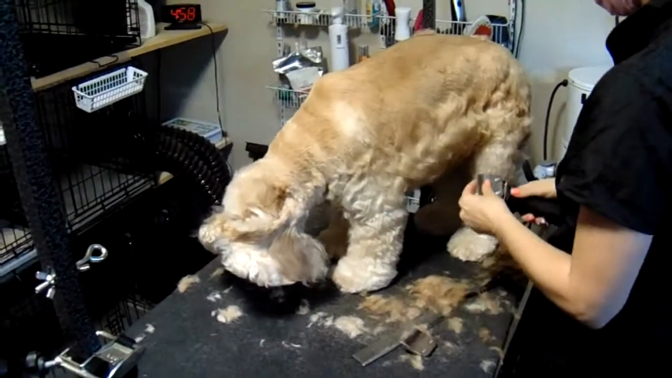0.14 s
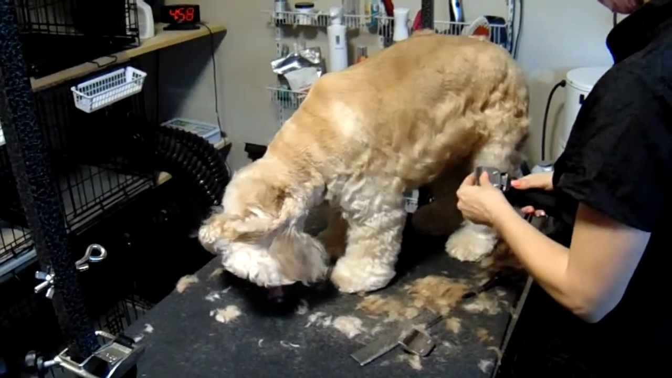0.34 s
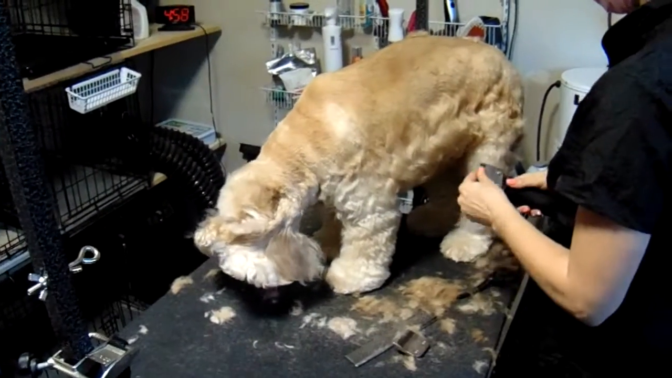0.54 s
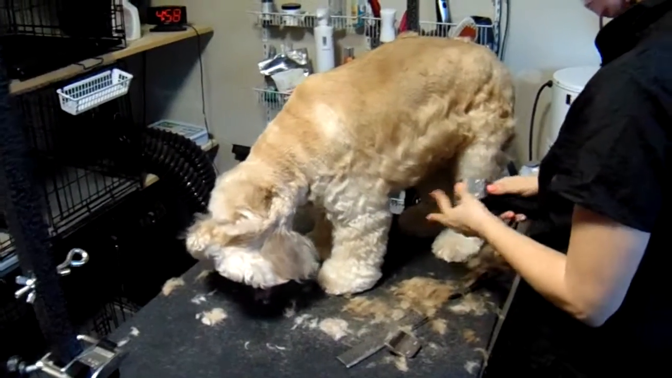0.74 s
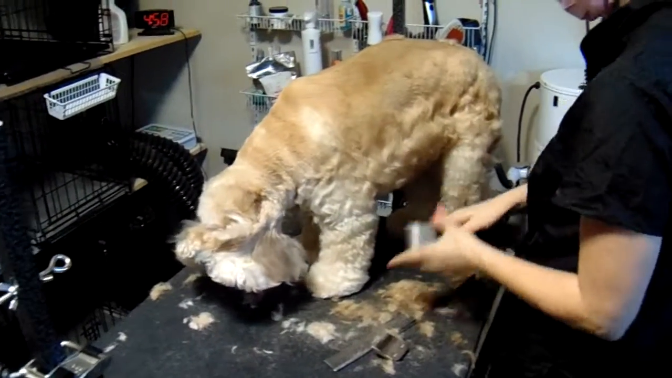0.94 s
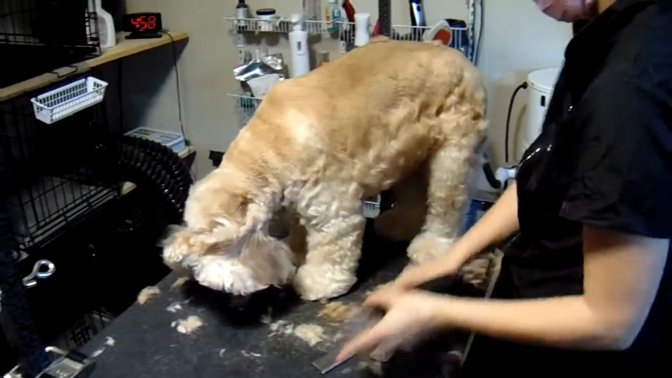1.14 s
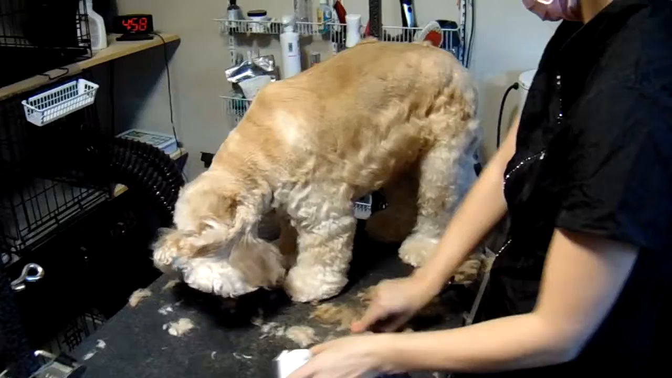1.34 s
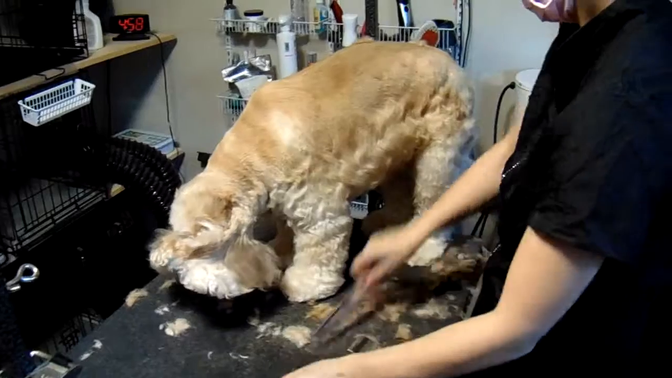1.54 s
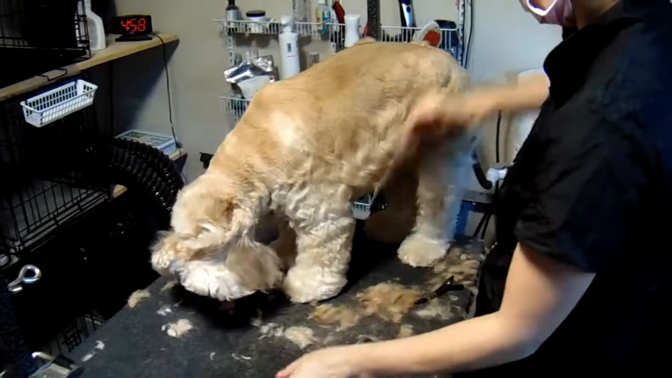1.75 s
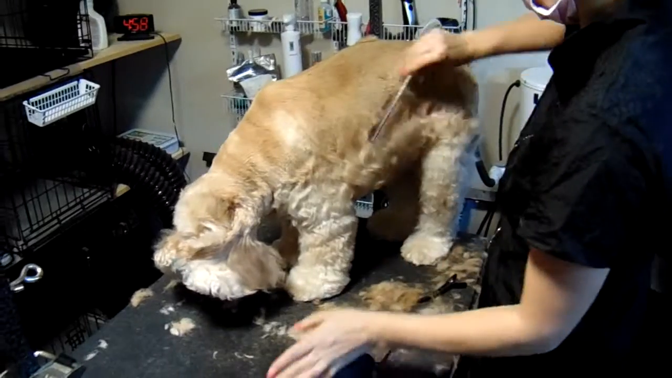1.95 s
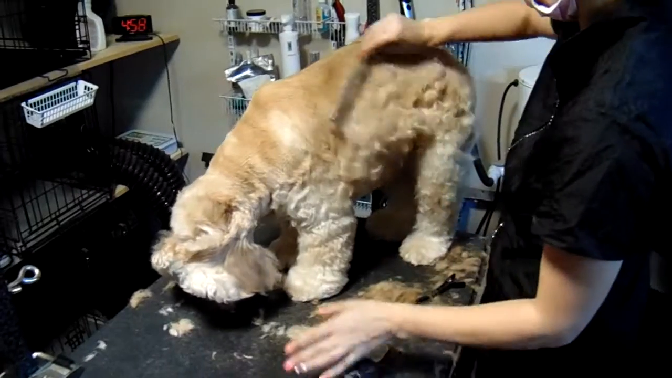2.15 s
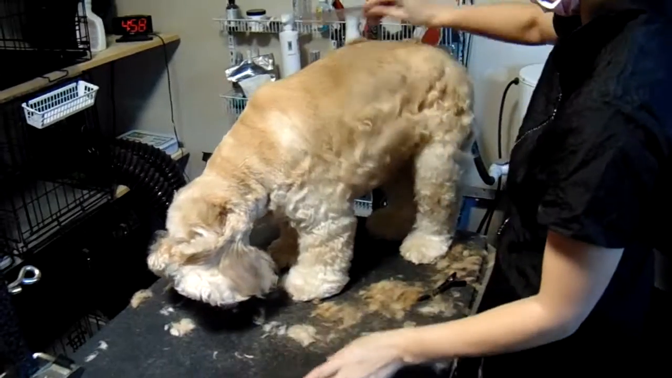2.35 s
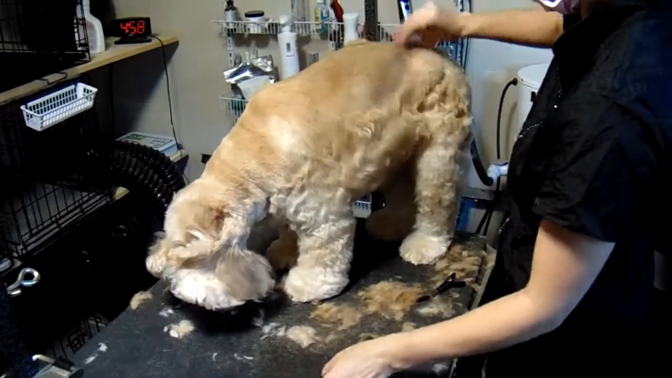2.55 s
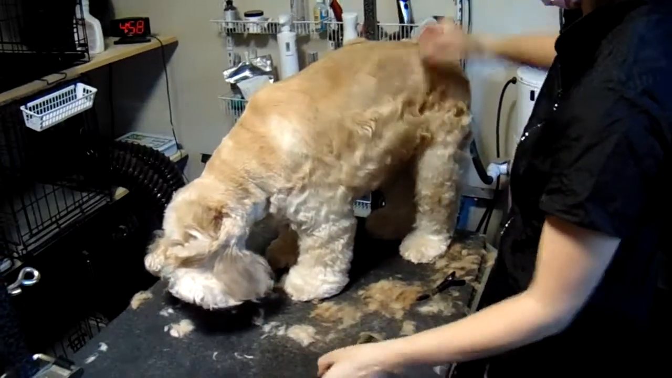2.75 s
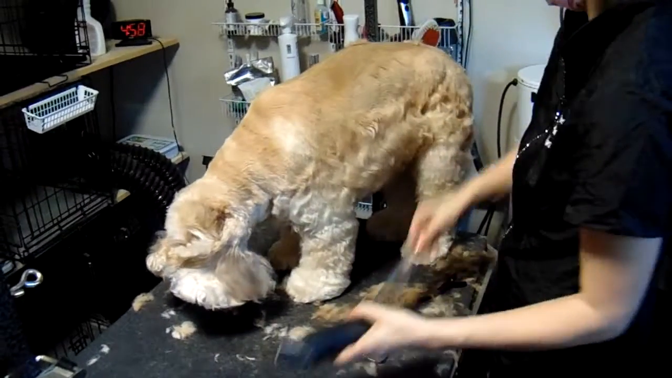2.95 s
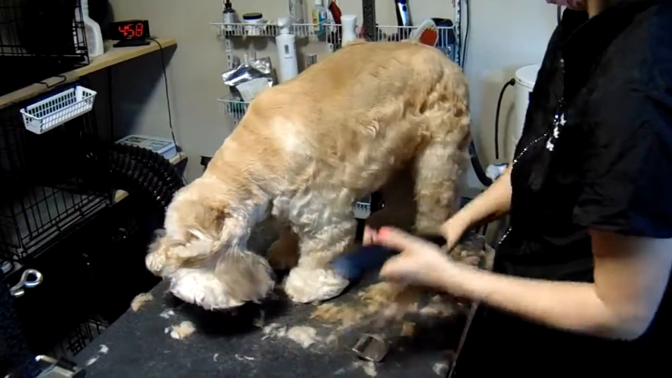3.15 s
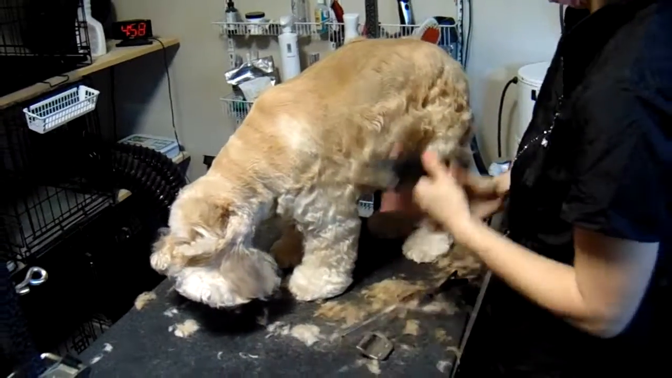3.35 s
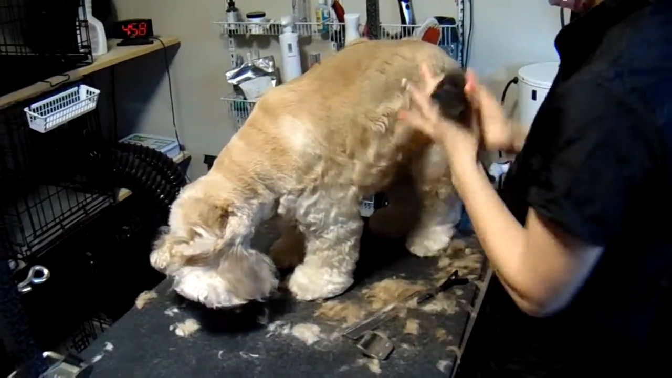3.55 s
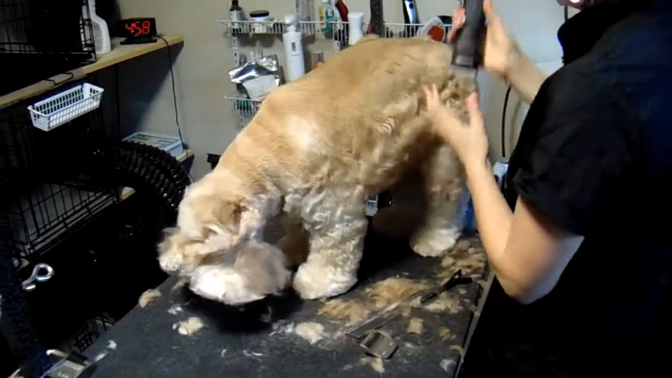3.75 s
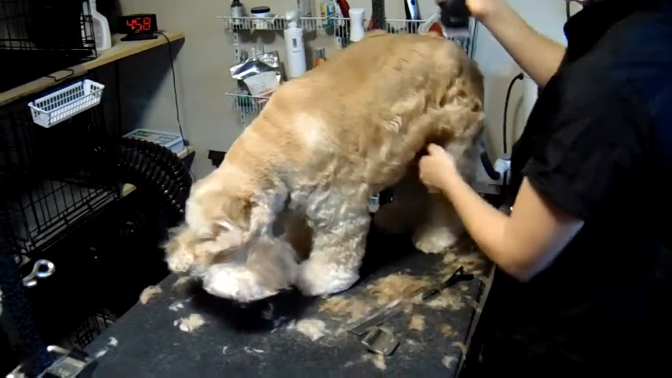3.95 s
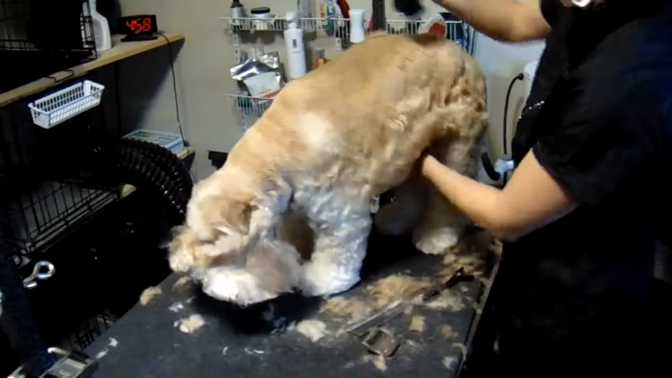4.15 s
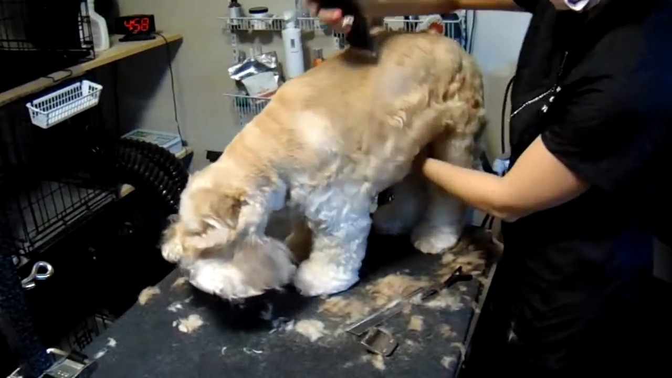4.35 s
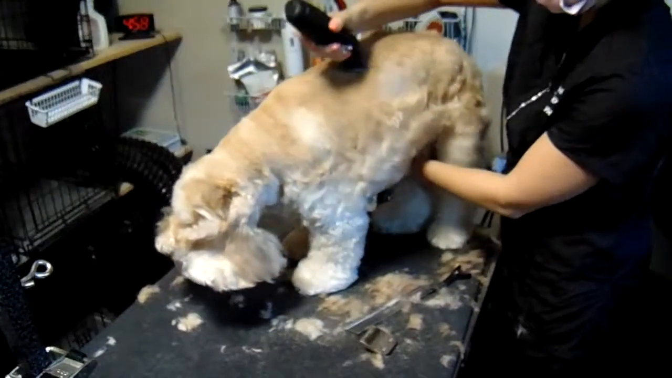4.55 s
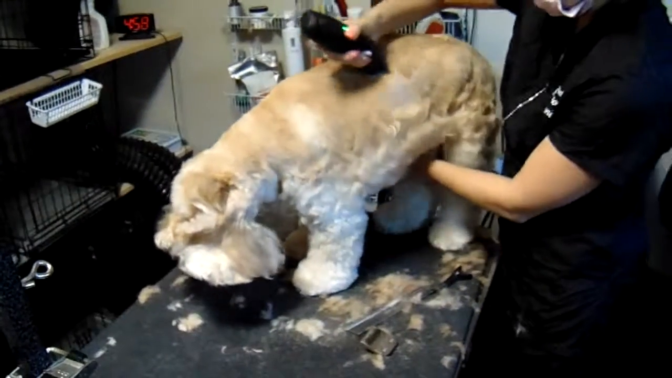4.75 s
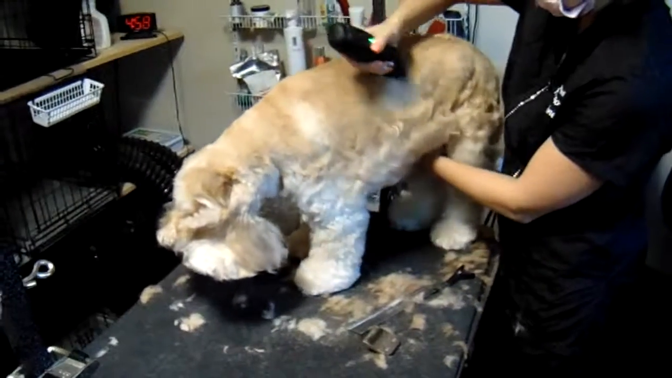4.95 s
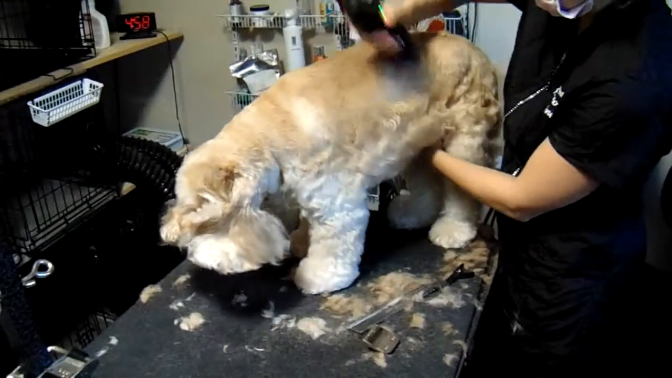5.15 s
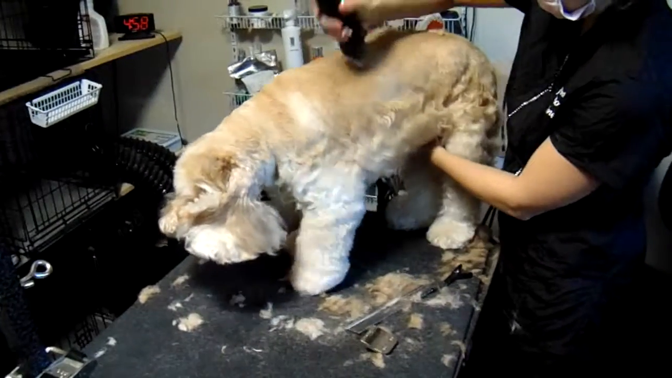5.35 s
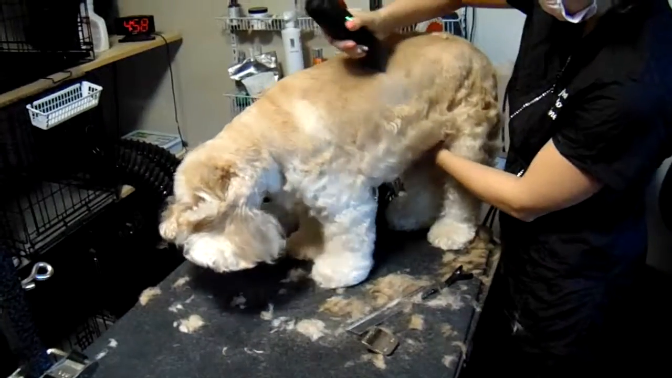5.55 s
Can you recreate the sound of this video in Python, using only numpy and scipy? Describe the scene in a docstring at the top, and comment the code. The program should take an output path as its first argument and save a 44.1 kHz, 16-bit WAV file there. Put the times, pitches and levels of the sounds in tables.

```python
"""Small, hard-walled room where a dog is groomed on a table. A metal guard is fiddled onto the clippers and
snaps home; a steel comb strokes the coat and drops on the table; then the clippers spin up and run.
Struck bodies are contact bursts through body spectra plus dying sines; the clippers follow motor speed
and cutting load. Close to the microphone a small lens motor ticks in short runs over a steady hiss."""
import sys
import numpy as np
from scipy import signal
from scipy.fft import rfft, irfft
from scipy.io import wavfile
from scipy.ndimage import map_coordinates

SR = 44100
rng = np.random.default_rng(int(sys.argv[2]) if len(sys.argv) > 2 else 0)


def persist_wave(psi):
    """Save psi, clipped to +-1, as 16-bit WAV."""
    counts = np.round(np.clip(psi, -1, 1) * 32767).astype(np.int16)
    wavfile.write(sys.argv[1], SR, np.atleast_2d(counts).T)


N = 246959


def from_db(db):
    """Decibels to amplitude."""
    return 10 ** (np.asarray(db) / 20)


def rms_one(x):
    """Scale to rms 1."""
    return x / np.sqrt(np.mean(x ** 2) + 1e-20)


def energy_one(x):
    """Scale to energy 1."""
    return x / np.sqrt(np.sum(x ** 2) + 1e-20)


def seconds(size):
    """Time axis."""
    return np.arange(size) / SR


def at_hz(points, hz):
    """Read a table on a log-frequency axis."""
    f, value = np.transpose(points)
    return np.interp(np.log(hz + 1e-6), np.log(f), value)


def along_time(points):
    """Read a table of (s, value) at every sample."""
    return np.interp(seconds(N), *np.transpose(points))


def through(x, response):
    """Pass a signal through an impulse response."""
    return signal.fftconvolve(x, response)[:N]


def colour(spectrum, size=4096):
    """Causal (minimum-phase) response of the given spectrum, by folding its cepstrum."""
    log_gain = np.log(from_db(at_hz(spectrum, np.fft.rfftfreq(size, 1 / SR))))
    cepstrum = irfft(log_gain)
    cepstrum[1:size // 2] *= 2
    cepstrum[size // 2 + 1:] = 0
    return energy_one(irfft(np.exp(rfft(cepstrum))))


def noise(spectrum):
    """Coloured noise of rms about 1."""
    return through(rng.standard_normal(N), colour(spectrum))


def drift(rate):
    """Smooth random curve through `rate` new values a second, each of spread 1."""
    return map_coordinates(rng.standard_normal(1024), [seconds(N) * rate], order=3, mode="grid-wrap")


def ringing(modes):
    """Response of a struck body: a sum of dying sines of alternating sign."""
    t = seconds(SR // 2)
    total = 0
    for k, (hz, db, t60) in enumerate(modes):
        decay = from_db(db - 60 * t / t60)
        total = total + (-1) ** k * decay * np.sin(2 * np.pi * hz * t)
    return energy_one(total)


def struck(times, levels_db, modes):
    """Clean blows on a ringing body."""
    clicks = np.zeros(N)
    at = np.clip(np.round(times * SR).astype(int), 0, N - 1)
    clicks[at] = from_db(levels_db)
    return through(clicks, ringing(modes))


def contacts(times, levels_db, grind, grind_s):
    """Each contact is a sharp click, then a brief grinding of the surfaces that swells and dies."""
    out, t = np.zeros(N + SR), seconds(SR // 10)
    for s, db in zip(times, levels_db):
        touch = grind * energy_one(rng.standard_normal(len(t)) * np.sqrt(t) * np.exp(-t / grind_s))
        touch[0] += 1
        # a hard contact excites all frequencies equally: the colour comes from the body
        phase = np.angle(rfft(touch, 2 * len(t)))
        touch = irfft(np.exp(1j * phase))[:len(t)]
        at = max(round(s * SR), 0)
        out[at:at + len(t)] += from_db(db) * energy_one(touch)
    return out[:N]


def room(gap_s, tail_db):
    """Direct sound, then, after a short gap, a diffuse tail that dies by band."""
    # Reverberation. Each row: frequency in Hz, T60 in s.
    room_t60 = [(150, 0.65), (1000, 0.3), (5000, 0.27), (13000, 0.24)]
    t = seconds(SR // 2)
    edges_hz, tail = np.geomspace(60, 18000, 10), 0
    for low, high in zip(edges_hz, edges_hz[1:]):
        band_filter = signal.butter(2, [low, high], "band", fs=SR, output="sos")
        band = signal.sosfilt(band_filter, rng.standard_normal(len(t)))
        t60 = at_hz(room_t60, np.sqrt(low * high))
        tail = tail + band * from_db(-60 * t / t60)
    response = from_db(tail_db) * energy_one(tail * (t > gap_s))
    response[0] += 1
    return energy_one(response)


def background():
    """Steady hiss, coloured from noise, with faint appliance tones as sines."""
    # Hiss spectrum. Each row: frequency in Hz, relative level in dB.
    hiss_spectrum = [(12, -9), (20, 6.5), (102, -9), (154, -11), (192, -3), (252, -9), (274, -5.5),
                     (382, -8), (489, -9), (531, -9.5), (922, -6), (1180, -6.5), (3370, -16), (6000, -11.5),
                     (14500, -21.5)]
    # Appliance tones. Each row: frequency in Hz, rms level in dB.
    whines = [(97, -69.5), (5841, -69.5)]
    hiss_db = -52
    t = seconds(N)
    tones = sum(from_db(db) * np.sqrt(2) * np.sin(2 * np.pi * hz * t) for hz, db in whines)
    return from_db(hiss_db) * noise(hiss_spectrum) + tones


def lens_motor():
    """Nearly evenly spaced motor steps, each a soft tick that rings the lens body."""
    # Motor runs. Each row: start in s, end in s, mean tick level in dB.
    runs = [(0.016, 0.06, -16.5), (0.149, 0.56, -16.5), (0.651, 0.86, -18.5), (3.986, 4.13, -18.5),
            (4.253, 4.76, -18.5), (4.851, 5.13, -20)]
    # Lens body modes. Each row: frequency in Hz, relative level in dB, T60 in s.
    body_modes = [(277.4, 4, 0.047), (326, 2.5, 0.055), (615, -4.5, 0.023), (975, -1, 0.039)]
    steps_per_s = 30
    steps = [(s, db) for start, end, db in runs for s in np.arange(start, end, 1 / steps_per_s)]
    s, db = np.transpose(steps)
    jittered_s = s + rng.normal(0, 0.0014, len(s))
    jittered_db = db + rng.normal(0, 0.11, len(s))
    return struck(jittered_s, jittered_db, body_modes)


def table_rumble():
    """Arms and tools bump the table: low noise that rises fast and settles."""
    # Bumps. Each row: start in s, relative level in dB.
    bumps = [(1.485, -49), (1.56, -51), (1.66, -47), (1.93, -55)]
    # Rumble spectrum. Each row: frequency in Hz, relative level in dB.
    rumble_spectrum = [(15, -50), (25, -4), (65, 1.5), (130, -8), (270, -10.5), (340, -30), (400, -13),
                       (520, -20), (880, -120)]
    attack_s, t60_s, gain_db = 0.014, 0.51, 4
    t, power = seconds(N), 0
    for s, db in bumps:
        attack = np.clip((t - s) / attack_s, 0, 1)
        decay = from_db(db - 60 * np.maximum(t - s - attack_s, 0) / t60_s)
        power = power + attack ** 2 * decay ** 2
    return from_db(gain_db) * np.sqrt(power) * noise(rumble_spectrum)


def coat():
    """Hands and comb stroke the coat; at 3.52 s, the wash of the dropped comb's clatter dying away."""
    # Swells of soft noise. Each row: start in s, length in s, level at the top of the arch in dB.
    swells = [(0, 1.17, -48), (1.34, 0.14, -53.5), (2.62, 0.59, -53.5), (3.52, 0.35, -54.5),
              (3.92, 0.15, -54)]
    # Soft noise spectrum. Each row: frequency in Hz, relative level in dB.
    soft_spectrum = [(350, -34), (600, -6), (845, -9), (1530, -4), (1720, -7.5), (2920, -4.5), (5070, -1),
                     (7340, 2), (14000, -28)]
    arch_exponent = 0.55   # smaller is flatter
    t, envelope = seconds(N), 0
    for s, length, db in swells:
        arch = np.abs(np.sin(np.pi * np.clip((t - s) / length, 0, 1)))
        envelope = envelope + from_db(db) * arch ** arch_exponent
    return envelope * noise(soft_spectrum)


def knocks():
    """Light knocks of tools, hands and the switch, each with its share of hollow body and bright tick."""
    # Knocks. Each row: start in s, hollow knock level in dB, bright tick level in dB.
    hits = [(1.463, -26, -22.5), (1.5, -12, -17.5), (1.617, -17, -21.5), (1.677, -19.5, -15),
            (1.705, -16.5, -18.5), (1.899, -12, -22), (1.95, -24, -16), (2.219, -21, -21.5),
            (2.45, -18, -30), (2.515, -22, -27), (2.627, -21, -37), (2.738, -19.5, -20), (4.03, -37, -17.5),
            (4.191, -18, -15.5)]
    # Hollow body spectrum. Each row: frequency in Hz, relative level in dB.
    hollow_spectrum = [(150, -27), (250, -18), (664, -2), (735, 1), (1420, 1.5), (1710, -1), (2400, -3),
                       (3700, -10.5), (7140, -15), (14000, -35)]
    # Bright tick spectrum. Each row: frequency in Hz, relative level in dB.
    tick_spectrum = [(1000, -43), (3000, -6.5), (4300, -1), (7300, 5), (9000, -13), (14000, -11)]
    s, knock_db, tick_db = np.transpose(hits)
    hollow = through(contacts(s, knock_db, grind=1.76, grind_s=0.0036), colour(hollow_spectrum))
    bright = through(contacts(s, tick_db, grind=2.2, grind_s=0.0032), colour(tick_spectrum))
    return through(hollow + bright, room(gap_s=0.0031, tail_db=0.5))


def housing():
    """The guard is pushed along the plastic housing with dull, hollow clacks."""
    # Clacks. Each row: start in s, level in dB.
    hits = [(0.626, -3), (0.663, 6.5), (0.678, -4), (0.694, -6)]
    # Plastic spectrum. Each row: frequency in Hz, relative level in dB.
    plastic_spectrum = [(180, -35), (300, -16), (465, -16), (565, -4), (623, -7), (904, 5.5), (1170, -3.5),
                        (1790, -1), (2100, -11.5), (3100, 0), (4020, -6.5), (6340, -4), (12700, -21.5),
                        (14500, -28)]
    # Housing modes. Each row: frequency in Hz, relative level in dB, T60 in s.
    plastic_modes = [(729, -1, 0.062), (820, -3, 0.12), (907, 5, 0.096), (1030, 8, .1), (1250, 4, 0.14),
                     (1440, 8, 0.16), (3170, -17, 0.17)]
    s, db = np.transpose(hits)
    clacks = through(contacts(s, db, grind=3.8, grind_s=0.0048), colour(plastic_spectrum))
    ring = from_db(-6.0) * struck(s, db, plastic_modes)
    return through(clacks + ring, room(gap_s=0.0033, tail_db=2.5))


def guard():
    """The guard's metal teeth tap the blade and ring; the hands shield the direct sound of the taps."""
    # Taps on the blade. Each row: start in s, tap level in dB, ring level of the teeth in dB.
    hits = [(0.001, -7, -5), (0.221, 6, -15), (0.2245, 1.5, -0.5), (0.395, -10.5, -19), (0.415, -34, -26),
            (0.465, 6, -0.5), (0.469, 0, -22)]
    # Tap spectrum. Each row: frequency in Hz, relative level in dB.
    tap_spectrum = [(180, -42), (300, 0), (389, -26.5), (584, -1.5), (675, -9.5), (744, -3), (1030, -6.5),
                    (1130, -16), (1470, -7), (3770, -21), (5570, 0.5), (7100, 1), (9510, -13),
                    (13400, -18.5), (14500, -43)]
    # Tooth modes. Each row: frequency in Hz, relative level in dB, T60 in s.
    tooth_modes = [(5220, -5, .14), (5370, -1, .2), (5425, 0, .24), (5510, -7, .14), (6428, -10, .12),
                   (6993, -12, .13), (8430, -7, .14)]
    s, tap_db, ring_db = np.transpose(hits)
    taps = through(contacts(s, tap_db, grind=3.8, grind_s=0.0037), colour(tap_spectrum))
    # tail above direct sound for the taps; the ring stays dry
    return through(taps, room(gap_s=0.0027, tail_db=3)) + struck(s, ring_db, tooth_modes)


def latch():
    """The spring latch slips, snaps home and rebounds, setting the clipper head ringing."""
    # Latch contacts. Each row: start in s, level in dB.
    hits = [(0.8676, 5), (0.8704, 10.5), (0.8742, 15), (0.8842, 3)]
    # Snap spectrum. Each row: frequency in Hz, relative level in dB.
    snap_spectrum = [(120, -61), (200, -31), (499, -17), (727, -7.5), (854, -20), (968, -6), (1310, -9.5),
                     (1720, 0), (2460, -13.5), (2890, -7), (3710, -11), (5710, -2.5), (9100, -14),
                     (10100, -13), (14500, -28)]
    # Clipper head modes. Each row: frequency in Hz, relative level in dB, T60 in s.
    head_modes = [(757, -2, 0.11), (1138, -2, .16), (1440, -5, .13), (1540, 1, 0.13), (1705, -3, 0.2),
                  (1925, 5.5, 0.14), (2000, -12, 0.27), (3500, -13, .16), (4210, 5.5, 0.056),
                  (4330, 3, 0.07), (4700, -9, 0.07)]
    s, db = np.transpose(hits)
    snap = through(contacts(s, db, grind=2.0, grind_s=0.0017), colour(snap_spectrum))
    ring = from_db(-6.5) * struck(s, db, head_modes)
    return through(snap + ring, room(gap_s=0.0031, tail_db=-6.0))


def comb():
    """The steel comb lands, bounces and rings, its teeth rattle; the table top thuds under it."""
    # Landings. Each row: start in s, steel level in dB, table thud level in dB, tooth rattle level in dB.
    hits = [(3.3154, 12, 0, -20), (3.325, -8, -8, -6), (3.395, -2, -22, -18), (3.429, -6, -8, -20),
            (3.437, -4.5, -18, -11), (3.48, -23.5, -15, -18), (3.527, -13.5, -30, -9),
            (3.607, -24, -28, -16.5)]
    # Steel spectrum. Each row: frequency in Hz, relative level in dB.
    steel_spectrum = [(410, -38), (700, -16), (775, -40), (1050, -20), (1580, -22.5), (2060, -15),
                      (2430, -23), (2930, -9.5), (3550, -23), (4080, -9), (5190, -17), (6360, 4.5),
                      (9420, -8), (13300, -11.5), (14500, -26)]
    # Tooth rattle spectrum. Each row: frequency in Hz, relative level in dB.
    rattle_spectrum = [(1000, -12), (3300, -19), (4200, -3.5), (5300, -6.5), (7200, -1), (8200, -9),
                       (9700, -1), (12000, -28), (13700, -9), (14500, -31)]
    # Steel modes. Each row: frequency in Hz, relative level in dB, T60 in s.
    steel_modes = [(4100, -21, .12), (6089, -4, .12), (6218, -3, .15), (7050, 1, .11), (7181, -1, .13),
                   (7623, -7, .13), (8333, -8, .13), (10410, -16, .12)]
    # Bending modes of the spine. Each row: frequency in Hz, relative level in dB, T60 in s.
    spine_modes = [(2910, -5, 0.16), (2940, -0.5, 0.085), (3030, 3, 0.055)]
    # Table top modes. Each row: frequency in Hz, relative level in dB, T60 in s.
    table_modes = [(164.2, 4.5, 0.23), (220, -1.5, 0.12), (255, 5, 0.11), (311, 5.5, 0.031),
                   (386, 2.5, 0.033), (443, 0, 0.046)]
    ring_db, spine_db = -7, -21.5
    spine_db_per_db = 1.6   # hard landings bend the spine far more than light bounces
    s, steel_db, thud_db, teeth_db = np.transpose(hits)
    clatter = through(contacts(s, steel_db, grind=7.7, grind_s=0.0065), colour(steel_spectrum))
    rattle = through(contacts(s, teeth_db, grind=5.0, grind_s=0.013), colour(rattle_spectrum))
    ring = from_db(ring_db) * struck(s, steel_db, steel_modes)
    bending = struck(s, spine_db + spine_db_per_db * steel_db, spine_modes)
    thud = struck(s, thud_db, table_modes)
    return through(clatter + rattle + ring + bending + thud, room(gap_s=0.0037, tail_db=-4.5))


def cutting_load():
    """The load builds as the blade enters the coat and eases as the hair falls away."""
    # Bites into the coat. Each row: deepest point in s, load from 0 to 1.
    bites = [(4.58, 0.38), (5.0, 0.75)]
    rise_s, release_s = .12, .22
    t, load = seconds(N), 0
    for s, depth in bites:
        fall = np.where(t < s, ((s - t) / rise_s) ** 2, (t - s) / release_s)
        load = load + depth * np.exp(-fall)
    return load


def hum(turns, hum_gain, case_gain):
    """The drive shakes the case at multiples of the turn rate; one multiple meets a resonance and sings."""
    # Multiples that stand out. Each row: multiple of the turn rate, relative level in dB.
    strong_orders = [(9, -7), (19, -6), (22, 0), (28, -4), (29, -4), (35, -4), (39, -2), (44, -2), (46, -1),
                     (48, 0), (56, -7), (68, -7), (76, -8)]
    # All other multiples. Each row: frequency in Hz, mean relative level in dB.
    weak_orders = [(500, -18), (1100, -10), (1400, -11), (2150, -8), (2600, -14), (3400, -14)]
    full_turns_per_s = 43.8
    case_order, case_hz, case_half_width_hz = 21, 918, 90

    def order(k):
        """Sine of rms 1 at k times the turn rate, with random phase."""
        return np.sqrt(2) * np.sin(2 * np.pi * (k * turns + rng.random()))

    def wander():
        """A line swells and fades as the clippers move through the room's standing waves."""
        knots_s = np.arange(0, N / SR + 1, .22)
        return np.interp(seconds(N), knots_s, from_db(rng.normal(0, 2.5, len(knots_s))))

    levels_db = {k: at_hz(weak_orders, k * full_turns_per_s) + rng.normal(0, 2) for k in range(13, 77)}
    levels_db.update(strong_orders)
    lines = (from_db(db) * wander() * order(k) for k, db in levels_db.items() if k != case_order)
    stack = rms_one(sum(lines))
    # the singing multiple only takes off once the motor is near full speed
    turns_per_s = np.gradient(turns) * SR
    detuning = (case_order * turns_per_s - case_hz) / case_half_width_hz
    singing = order(case_order) / np.hypot(1, detuning)
    return hum_gain * stack + case_gain * singing


def blade(turns, sharpness, buzz_db, hiss_db, size=1024):
    """The cutter rubs over the same teeth on every turn and hisses, hardest at its two reversals."""
    # Blade spectrum. Each row: frequency in Hz, relative level in dB.
    blade_spectrum = [(1350, -48), (2300, 3.5), (2600, -5.5), (3080, -4.5), (4160, -5.5), (5450, -1),
                      (7250, -2), (8260, -5), (9350, -13.5), (11600, -15), (13800, -26), (14500, -30)]
    stroke = rms_one(np.exp(sharpness * np.cos(2 * np.pi * 2 * turns)))
    # flat-spectrum random profile, read once per turn
    profile = rms_one(irfft(np.exp(2j * np.pi * rng.random(size // 2 + 1))))
    teeth = map_coordinates(profile, [turns % 1 * size], order=3, mode="grid-wrap")
    rub = stroke * (from_db(buzz_db) * teeth + from_db(hiss_db) * rng.standard_normal(N))
    highpass = signal.butter(4, 2500, "high", fs=SR, output="sos")
    bright = signal.sosfilt(highpass, through(rub, colour(blade_spectrum)))
    return through(bright, room(gap_s=0.0023, tail_db=-6.5))


def clippers():
    """Speed and load drive the motor hum, the case whirr, the blade chatter and the rasp of cut hair."""
    # Running speed, sagging a little in the coat. Each row: time in s, turns per s before spin-up and wobble.
    running_speed = [(4.62, 43.8), (4.696, 43.9), (5.088, 43.5), (5.366, 44.0), (5.6, 44.2)]
    # Singing multiple of the case. Each row: time in s, level in dB before trim, speed and detuning.
    singing_levels = [(4.55, -47), (4.59, -42), (5.034, -43.5), (5.084, -49), (5.252, -42.5),
                      (5.408, -56.5), (5.6, -51)]
    # Whirr of bearings and air in the case. Each row: frequency in Hz, relative level in dB.
    whirr_spectrum = [(60, -12), (100, -4.5), (250, -13), (480, -4.5), (780, 0.5), (1100, -6.5),
                      (2200, 0.5), (3200, -11), (6000, -24)]
    # Rasp of sheared hair. Each row: frequency in Hz, relative level in dB.
    hair_spectrum = [(400, -30), (750, -3), (1000, -3), (1500, 0), (2200, -3), (3000, -14), (6000, -26)]
    switch_on_s, spin_up_s = 4.185, .418
    hum_speed_power, blade_speed_power = 6, 1.5   # amplitude grows as these powers of the speed
    hum_db, hum_load_db, singing_trim_db = -47.3, 6, 0.5   # hum at full speed; its gain at load 1
    blade_db, blade_rise_db_per_s = -42, 3   # gain on reaching full speed; slow growth as clippers move
    whirr_db, shearing_db = -50.5, -40.5   # at full speed; at load 1
    t, load = seconds(N), cutting_load()
    spin = np.clip((t - switch_on_s) / spin_up_s, 0, 1)
    wobble = 1 + .0008 * drift(35)
    turns = np.cumsum(spin * along_time(running_speed) * wobble) / SR
    hum_gain = spin ** hum_speed_power * from_db(hum_db + hum_load_db * load)
    case_gain = spin ** hum_speed_power * from_db(singing_trim_db + along_time(singing_levels))
    blade_growth_db = blade_rise_db_per_s * (t - switch_on_s - spin_up_s)
    blade_gain = spin ** blade_speed_power * from_db(blade_db + blade_growth_db)
    chatter = blade_gain * blade(turns, sharpness=0.19, buzz_db=-0.5, hiss_db=-2.5)
    whirr = spin ** blade_speed_power * from_db(whirr_db) * noise(whirr_spectrum)
    rasp = from_db(shearing_db) * load * noise(hair_spectrum)
    return hum(turns, hum_gain, case_gain) + whirr + chatter + rasp


def scene():
    """One microphone hears the room, its own lens, the tools and the clippers."""
    surroundings = background() + lens_motor() + table_rumble() + coat()
    tools = knocks() + housing() + guard() + latch() + comb()
    return (surroundings + tools + clippers())[None]


def record(dry):
    """Peaks clip just below full scale, then the top is cut steeply."""
    cutoff_hz = 14400
    lowpass = signal.ellip(12, .1, 90, cutoff_hz, fs=SR, output="sos")
    return signal.sosfilt(lowpass, np.clip(dry, -.95, .95))


dry = scene()
out = record(dry)
persist_wave(out)
```